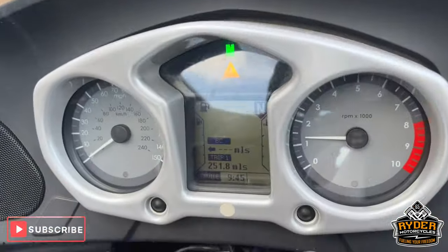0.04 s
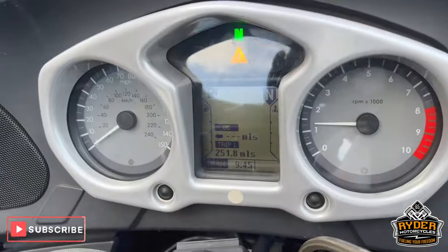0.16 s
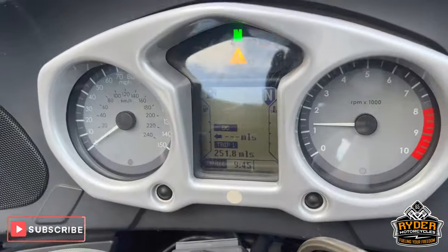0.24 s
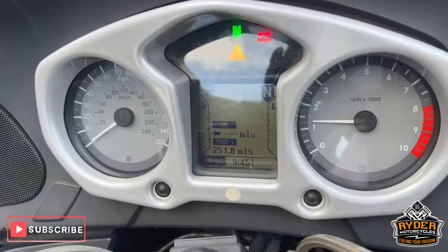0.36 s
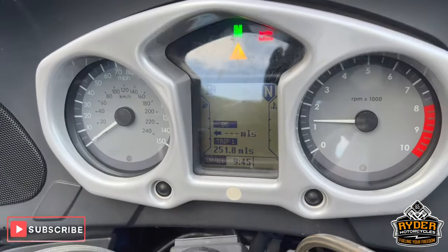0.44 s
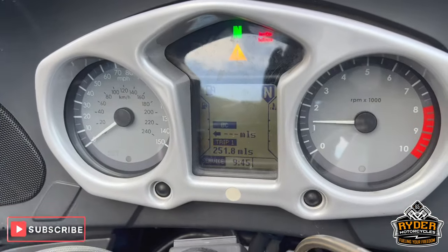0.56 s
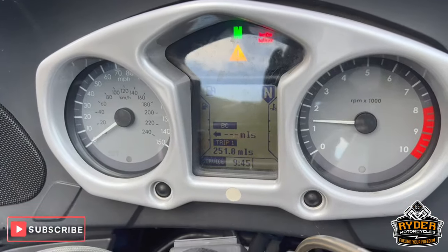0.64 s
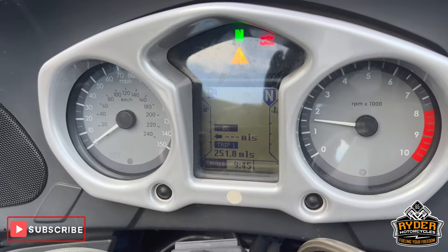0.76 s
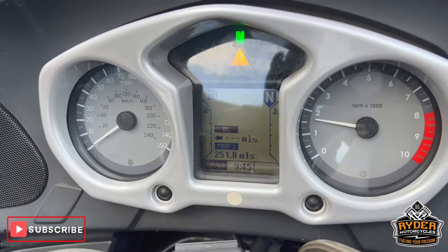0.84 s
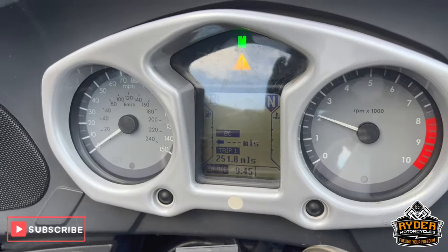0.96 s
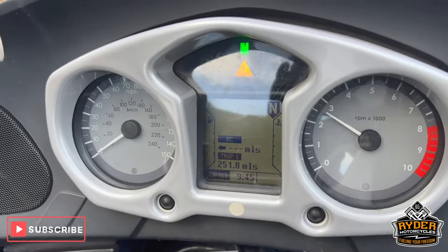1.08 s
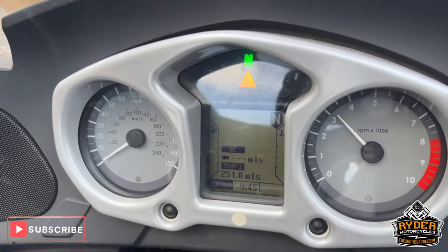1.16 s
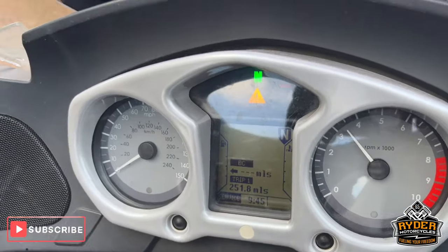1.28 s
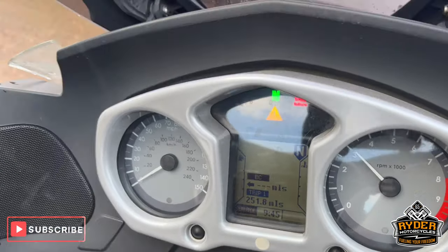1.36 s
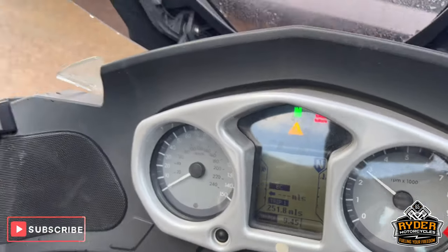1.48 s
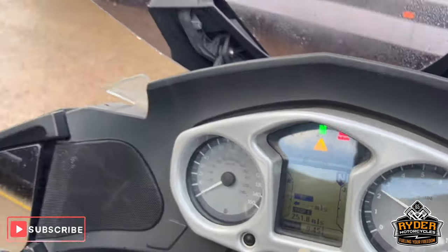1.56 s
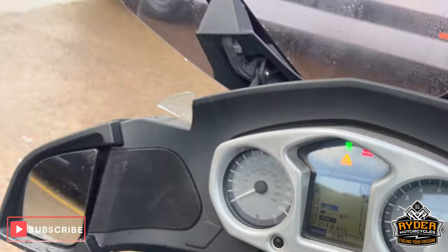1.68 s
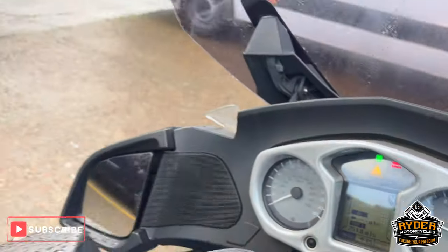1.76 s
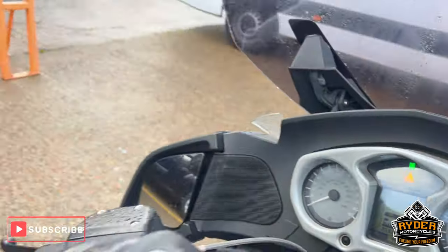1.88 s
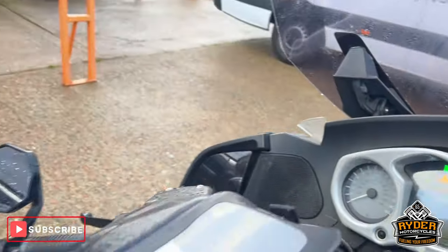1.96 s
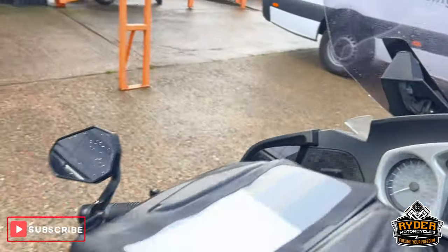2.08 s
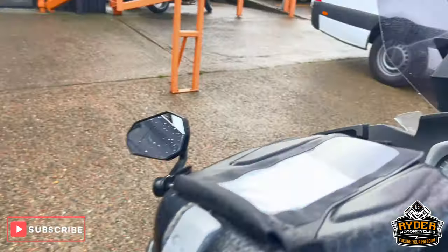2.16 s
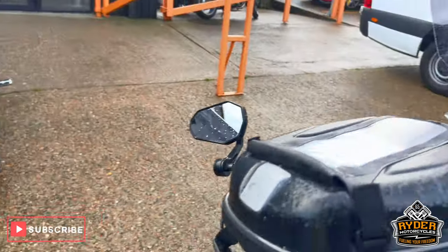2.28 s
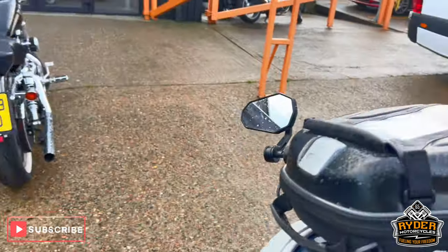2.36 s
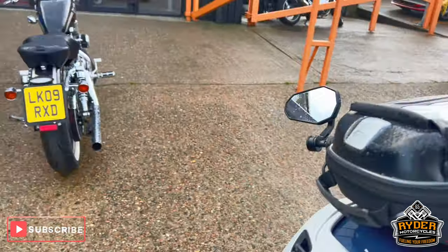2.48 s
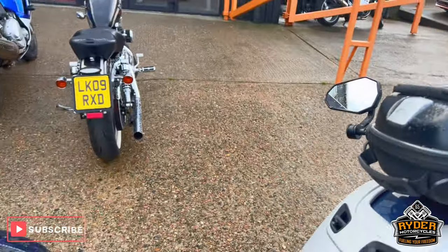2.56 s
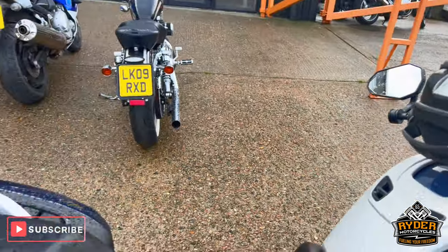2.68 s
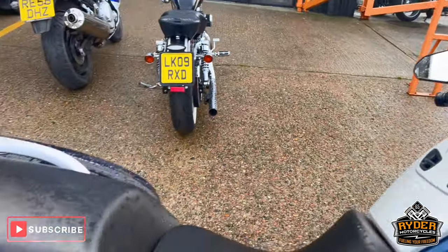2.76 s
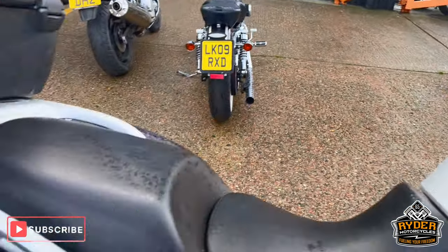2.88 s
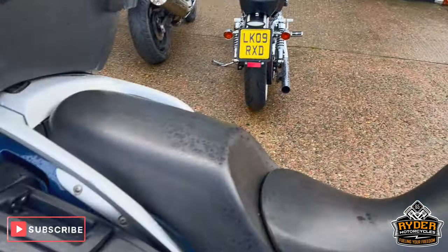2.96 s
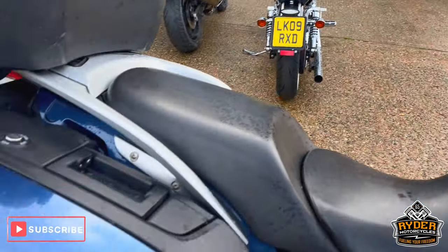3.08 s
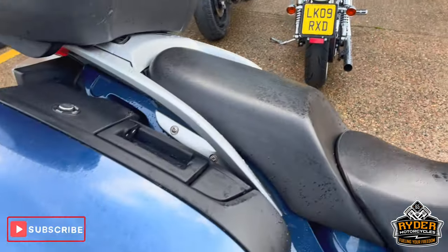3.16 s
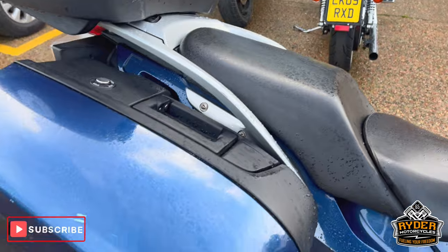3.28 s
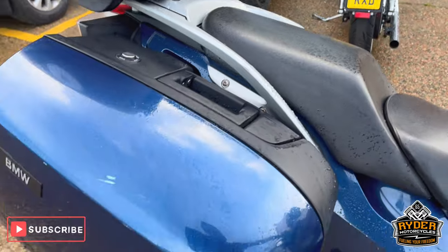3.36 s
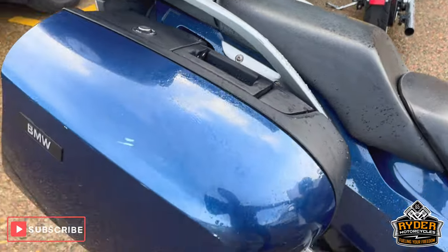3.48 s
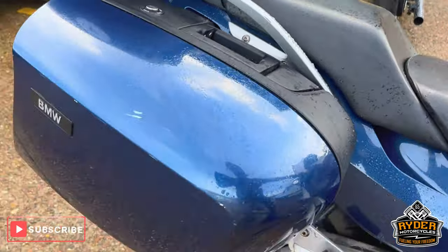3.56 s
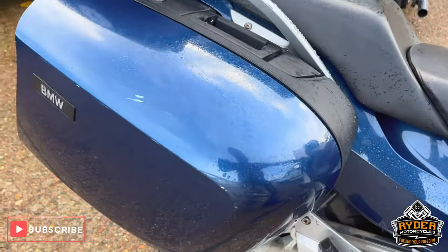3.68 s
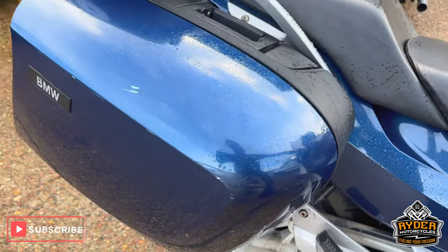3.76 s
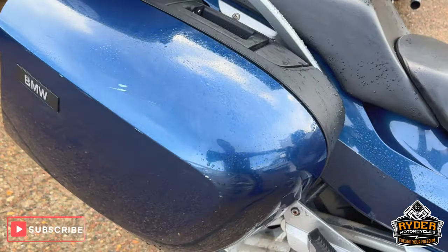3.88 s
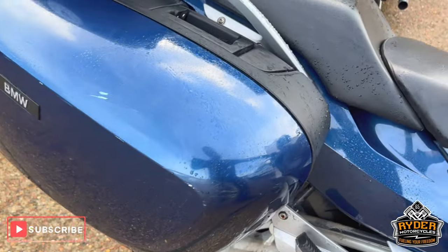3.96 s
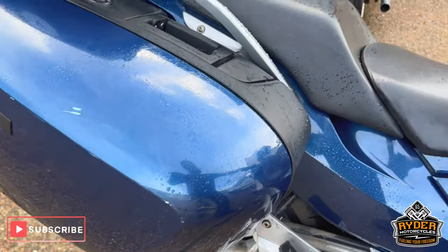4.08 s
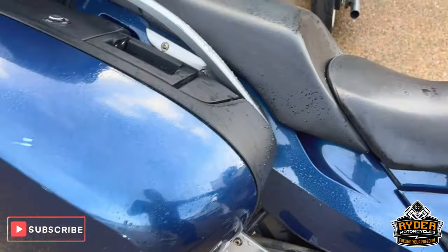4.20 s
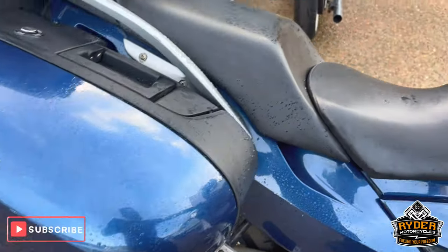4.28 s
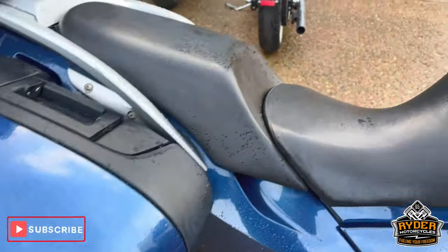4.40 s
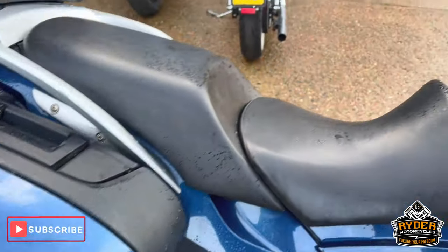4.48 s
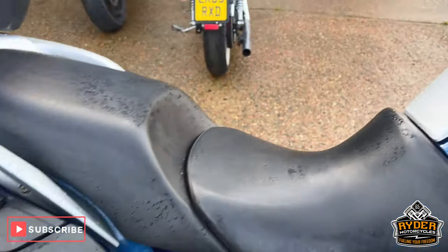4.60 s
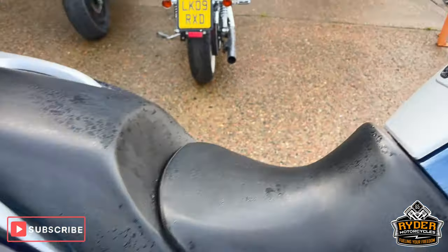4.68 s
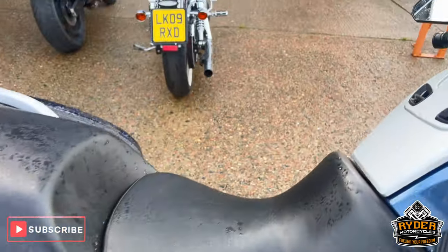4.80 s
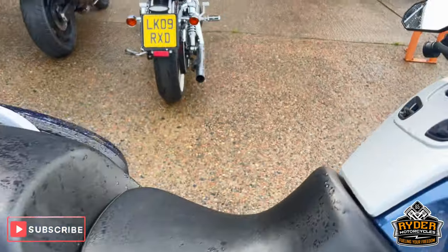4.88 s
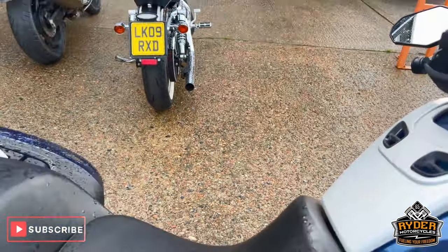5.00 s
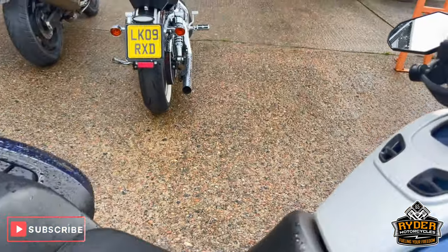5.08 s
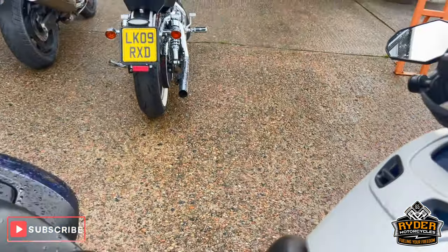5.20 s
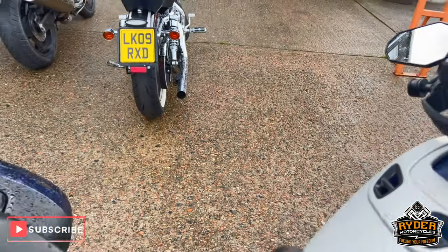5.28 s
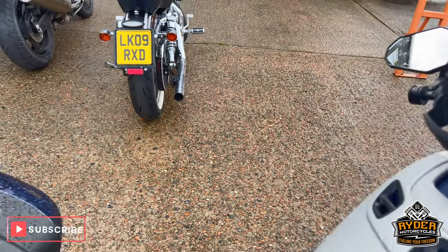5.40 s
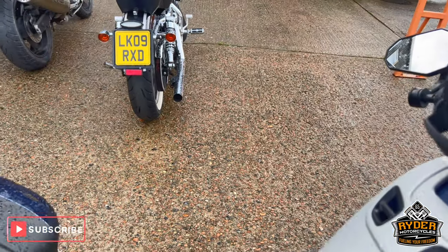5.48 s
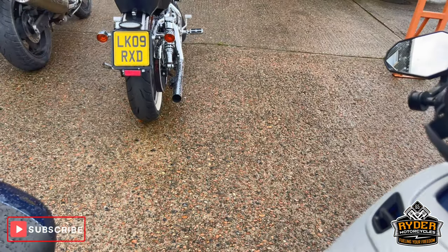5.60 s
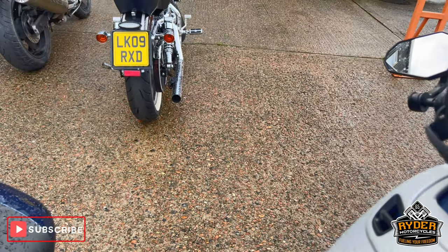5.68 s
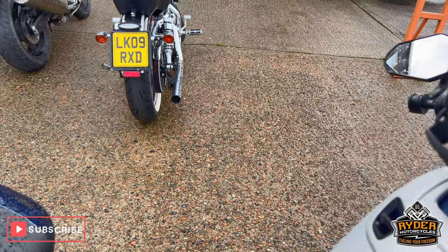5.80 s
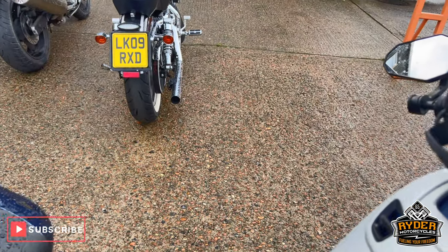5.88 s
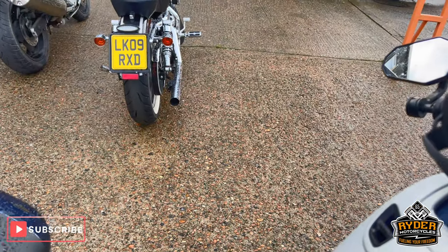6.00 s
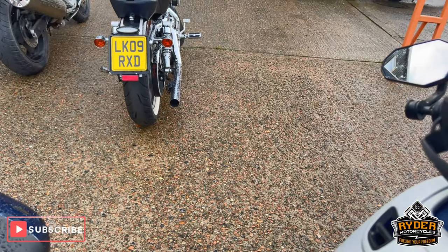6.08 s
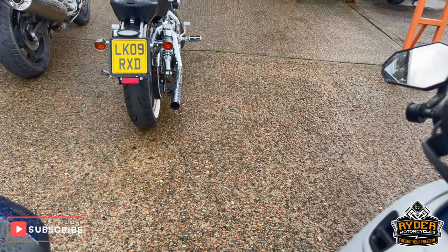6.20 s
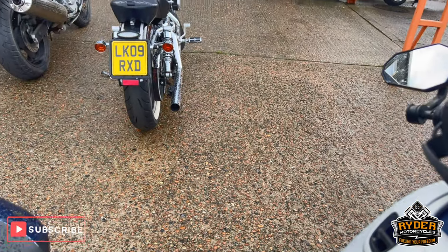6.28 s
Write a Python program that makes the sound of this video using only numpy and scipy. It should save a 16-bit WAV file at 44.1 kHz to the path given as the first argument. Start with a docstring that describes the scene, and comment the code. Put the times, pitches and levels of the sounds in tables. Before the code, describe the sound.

From 0 to 0.5 s a twin-cylinder motorcycle idles close to a handheld phone outdoors: low booming beats, about twenty-two a second, with valve clatter, chain rush and narrow metallic buzzes. At 0.5 s the throttle opens; a honking intake and growing roar, rasp and hiss climb to a peak near 1.17 s, with hoarse gear whine. It shuts, falters and burbles down to idle by about 2.1 s. Between 1.5 and 2.7 s the phone moves toward the silencer, with faint grainy rustles; brief squeaky chirps of rubbing parts cluster around 2.8 to 3.3 s. At 3.1 s a faster, louder blip begins, reaching its higher peak at 3.8 s, the phone squashing the loudest part. Revs tumble with uneven surges and descending whines through 4.7 s. From 5 s to the end at 6.3 s the engine idles steadily, thudding and ticking.

```python
"""A twin-cylinder motorcycle idles at the cockpit: low booming beats, valve clatter, narrow buzzes.
Throttle opens at 0.5 s: the intake honks, firings ring roar and rasp, gas hisses, gears whine; revs fall from 1.2 s.
From 1.4 to 2.8 s the phone moves to the silencer: thin rustles, then chirps of parts rubbing.
A second, faster blip opens at 3.1 s and peaks at 3.8 s; the engine surges down and idles from 5 s to the end.
Tones, pulses and cyclic noise follow one crank angle; filtered noise adds hiss, rumble and rustle."""
import sys
import numpy as np
from scipy import signal
from scipy.fft import rfft, irfft
from scipy.io import wavfile
from scipy.ndimage import uniform_filter1d

SR = 44100
rng = np.random.default_rng(int(sys.argv[2]) if len(sys.argv) > 2 else 0)


def file_out(sig):
    """Save sig as 16-bit WAV at sys.argv[1]."""
    # one column per channel
    cols = np.atleast_2d(sig).T
    # limit, then scale
    lim = np.clip(cols, -1, 1)
    pcm = np.round(lim * 32767).astype(np.int16)
    wavfile.write(sys.argv[1], SR, pcm)


N = 279594
TIME = np.arange(N) / SR

# crank speed, one firing per turn: [t/s, f/Hz]
CRANK_SPEED = [(0.0, 22.04), (0.5, 23.42), (0.76, 26.83), (0.93, 35.61), (1.05, 49.17), (1.17, 62.19),
               (1.42, 42.99), (1.57, 35.86), (1.8, 29.81), (1.95, 26.88), (2.14, 22.04), (2.65, 22.81),
               (3.08, 23.32), (3.3, 27.27), (3.57, 45.6), (3.77, 72.35), (3.83, 77.01), (4.02, 59.63),
               (4.27, 41.36), (4.42, 34.86), (4.6, 29.78), (4.97, 22.01), (5.2, 22.63), (6.34, 22.92)]
# throttle twists: [opening t/s, shutting t/s]
THROTTLE_TWISTS = [(0.48, 1.165), (3.082, 3.81)]
# phone moves from cockpit to silencer: [start t/s, end t/s]
PHONE_MOVE_S = 1.41, 2.8
# uneven burning shifts exhaust levels off the throttle:
# [t/s, half length/s, fundamental level/dB, overtones level/dB, roar level/dB]
BURN_SURGES = [(1.313, 0.098, 12.5, 11, 1), (1.431, 0.029, 5, -8.5, -6.5), (1.584, 0.096, 5, -2, 3),
               (1.71, 0.055, -7, 10.5, 2.5), (3.89, 0.013, -9, 6, 3.5), (4.004, 0.051, 4.5, 13.5, 5),
               (4.121, 0.046, 15, 3, -1), (4.29, 0.032, 9, 3.5, 5.5), (4.477, 0.028, -9, 4, 5)]

# effort laws: [level at idle/dB, slope/(dB/octave), knee/octaves, full-throttle lift/dB]
# exhaust boom, rows: harmonics 1 to 3
BOOM_LAWS = [(-66, 27.5, 1.65, 2), (-49, 19, 0.7, 9), (-51.5, 6, 2, 9)]
# pipe, rows: thud, rumble
PIPE_LAWS = [(-59, 10.5, 1.4, 15), (-53.5, 24.5, 0.95, -0.5)]
# gas, rows: roar, rasp, hiss; levels before the off-idle fade
COCKPIT_LAWS = [(-52.5, 22, 2.1, 9), (-77, 38.5, 1.164, 1), (-58, 15.5, 1.5, 1)]
SILENCER_LAWS = [(-57.5, 24.4, 1.524, 10.5), (-66, 28.9, 1.488, 4.5), (-59, 19.22, 1.53, -1)]
# further boom harmonics of fixed mean level: [multiple of firing rate, level/dB]
UPPER_HARMONICS = [(4, -66), (5, -58), (6, -56)]

# resonances: [f/Hz, width/Hz, relative level/dB]
PIPE_MODES = [(144, 98, -6), (200, 18, -4), (247.3, 5.2, 5.5), (370, 54, -6), (419.1, 7.9, 7),
              (586, 18, -27)]
COCKPIT_ROAR_MODES = [(238, 70, -11.5), (315.6, 36, -0.5), (357.6, 31.4, 0), (414.5, 36, -4),
                      (688, 190, -9), (820, 360, -13.5)]
SILENCER_ROAR_MODES = [(224, 35, -9.5), (298.3, 28, -3), (433, 67, 2), (501.3, 45, -2), (631, 32, -10.5),
                       (731, 71, 1), (906, 670, -8.5)]
COCKPIT_RASP_MODES = [(1026, 170, 9), (1329, 23, 12), (1453, 75, 6.5), (1960, 120, -2.5), (2516, 25, 9.5),
                      (3020, 4500, -5.5)]
SILENCER_RASP_MODES = [(986, 330, -0.5), (1265, 34, 6.5), (1363, 72, -1), (1696, 77, -1), (1910, 97, -3.5),
                       (2380, 1200, -12), (2910, 550, -13.5)]

# noise spectra: [f/Hz, relative density level/dB]
COCKPIT_HISS_SPECTRUM = [(2200, -19), (3200, -6), (4200, 4.5), (5000, 7), (5900, -10), (7000, -1),
                         (8100, -10), (9200, 0), (10600, -19), (12500, -23), (14800, -17), (16000, -35)]
SILENCER_HISS_SPECTRUM = [(1700, -28.5), (2500, 0.5), (3300, -8), (4000, -0.5), (5200, 2), (6900, 1.5),
                          (8000, -4.5), (9100, -2), (10300, -15.5), (12500, -22.5), (15000, -26),
                          (16000, -35)]
CLATTER_SPECTRUM = [(120, -12), (280, 2.5), (500, 0), (800, -3), (1100, -7.5), (1600, -8), (2400, -15),
                    (3300, -15.5), (4500, -7.5), (6000, -18.5), (7000, -15.5), (8200, -22.5), (9100, -14.5),
                    (10500, -30.5), (15000, -49)]
RUSTLE_SPECTRUM = [(4000, -18), (5500, -2), (7500, 0), (9500, -9.5), (12200, -13), (15500, -33)]
SIZZLE_SPECTRUM = [(9000, -41), (10400, -4), (11300, -5), (12300, -12), (13000, -45)]
RUMBLE_SPECTRUM = [(10, -14), (25, -4), (45, -3), (80, 1), (120, -2), (170, -8), (260, -17), (600, -45),
                   (1500, -80)]

# buzzes, and an intake honk (373 Hz row): [start t/s, end t/s, f/Hz, width/Hz, level at idle/dB]
BUZZ_AND_HONK_MODES = [(-.1, 0.476, 1108, 34.6, -60.5), (-.1, 0.58, 850, 30.4, -63),
                       (0.428, 0.915, 1520, 130, -60), (0.45, 0.85, 373, 53, -50.5),
                       (1.453, 1.85, 4750, 295, -64.5), (1.845, 2.086, 4800, 200, -57),
                       (2.188, 2.566, 1914, 50, -67.5), (3.026, 4.71, 5560, 170, -64),
                       (2.93, 4.817, 4850, 119, -65), (3.123, 3.502, 1854, 110, -57),
                       (3.147, 4.591, 1270, 35.5, -64), (3.13, 4.72, 684, 36, -53)]
# rustling swishes: [start t/s, end t/s, body level/dB, sizzle level/dB]
RUSTLE_SWISHES = [(1.57, 1.804, -61, -68), (1.78, 2.114, -57.5, -60.5), (1.9, 1.978, -54, -59),
                  (2.287, 2.73, -66.5, -72.5), (2.394, 2.6, -79, -70)]
# gear whine through casing resonances:
# [t/s, half length/s, multiple of firing rate, level/dB, hoarseness/0-1]
GEAR_WHINES = [(.76, 0.054, 25, -47, 0.24), (0.845, 0.1, 64, -54.5, 0.5), (0.995, 0.063, 25, -34.5, 1),
               (1.15, 0.067, 25, -33, 0.9), (1.284, 0.026, 25, -32.5, 0.4), (1.406, 0.042, 25, -32, 0.07),
               (1.57, 0.036, 25, -42.5, .3), (1.75, 0.042, 25, -42, 0.06), (1.615, 0.064, 128, -57, .5),
               (1.846, 0.18, 64, -55.5, 0.42), (4.16, 0.062, 102, -42, 0.8), (4.22, 0.045, 112, -44, 1),
               (4.398, 0.081, 140, -63, .9), (4.235, .06, 160, -53, 0.6), (4.314, .045, 25, -36.5, 0.17),
               (4.316, 0.025, 102, -47.5, 0.7), (4.377, 0.095, 64, -53.5, 0.4), (4.559, 0.029, 64, -50, .2),
               (4.57, 0.053, 160, -61, 0.5), (4.661, 0.024, 25, -50, 0)]
# rubbing parts: [t/s, half length/s, f/Hz, glide/(Hz/s), level/dB]
RUB_CHIRPS = [(2.2, 0.019, 930, 0.5, -59.5), (2.766, 0.055, 5600, -900, -63),
              (2.853, 0.074, 5020, -1500, -58.5), (2.845, 0.016, 1250, 0, -53),
              (2.893, 0.014, 1880, -4, -58), (2.985, 0.0075, 1830, -2, -51.5), (3.004, 0.0086, 701, 1, -48),
              (3.013, 0.046, 1236, 0.5, -55.5), (3.181, 0.03, 1235, 299.5, -53),
              (3.293, 0.056, 1020, -1500, -49.5)]

IDLE_HZ = 22.5
START_TURNS, STROKE_LAG_TURNS = 0.48, 0.14
THROTTLE_OPEN_S, THROTTLE_SHUT_S = 0.44, 0.03
FALTER_LAG_S, FALTER_HALF_S = 0.0084, 0.02  # combustion falters after the throttle shuts
FALTER_OVERTONES_DB, FALTER_ROAR_DB = -9, -6
TAILPIPE_HZ, TAILPIPE_WIDTH_HZ, TAILPIPE_LIFT_DB = 84.1, 22.6, 7
STEADY_FLUTTER_DB, BURBLE_DB = 0.6, 1.5
OFF_IDLE_OCTAVES = 0.56  # gas noise sets in over this rise
BUZZ_DB_PER_OCTAVE, BUZZ_FLUTTER_DB = 12.5, 1
WOBBLE_TURNS = 0.0042  # crank twists to and fro, blurring the higher whines most
CHIRP_WAVER_SHARE = 0.028  # of the pitch
RUSTLE_FADE_S = 0.048
GAIN_TOP_DB, GAIN_WINDOW_S = -4.5, 0.049
TOP_HZ = 15200


def undb(db):
    """Decibels to gain."""
    return 10 ** (np.asarray(db) / 20)


def unit(x):
    """Scale to rms 1."""
    return x / np.sqrt(np.mean(x ** 2))


def noise():
    """White noise."""
    return rng.standard_normal(N)


def walk(rate_hz):
    """Smooth random wander of rms 1."""
    hold = int(SR / rate_hz)
    steps = noise()[np.arange(N) // hold]
    return unit(uniform_filter1d(uniform_filter1d(steps, hold), hold))


def swell(at_s, half_s):
    """Gaussian bump of height 1."""
    return np.exp(-0.5 * ((TIME - at_s) / half_s) ** 2)


def span(start_s, end_s, fade_s):
    """Window between two times, with linear fades inside."""
    return np.clip(np.minimum(TIME - start_s, end_s - TIME) / fade_s, 0, 1)


def colour(x, spectrum):
    """Filter by a (Hz, dB) spectrum, keeping the power of a white input."""
    hz, db = np.transpose(spectrum)
    f = np.maximum(np.fft.rfftfreq(N, 1 / SR), 1)
    gain = unit(undb(np.interp(np.log(f), np.log(hz), db)))
    return irfft(rfft(x) * gain, N)


def ring(x, modes, low_hz, high_hz):
    """Ring damped modes between band edges, keeping the power of a white input."""
    t = np.arange(SR // 8) / SR
    response = 0
    for k, (hz, width, db) in enumerate(modes):
        decay = np.exp(-np.pi * width * t)
        response = response + (-1) ** k * undb(db) * width * decay * np.cos(2 * np.pi * hz * t)
    band = signal.butter(3, [low_hz, high_hz], "band", fs=SR, output="sos")
    response = signal.sosfilt(band, response)
    return signal.fftconvolve(x, response / np.linalg.norm(response))[:N]


def resonance(hz, centre_hz, width_hz):
    """Power response of one resonance, 1 at its centre."""
    return 1 / (1 + (2 * (hz - centre_hz) / width_hz) ** 2)


def revs(hz):
    """Octaves of crank speed above idle."""
    return np.maximum(np.log2(hz / IDLE_HZ), 0)


def throttle():
    """Opening, 0 shut to 1 open: rolled on, snapped shut."""
    opening = 0
    for opens, shuts in THROTTLE_TWISTS:
        rise = np.clip((TIME - opens) / THROTTLE_OPEN_S, 0, 1)
        opening = opening + rise * np.clip(1 - (TIME - shuts) / THROTTLE_SHUT_S, 0, 1)
    return opening


def effort_db(hz, laws):
    """Layer levels: rise with speed up to a knee, and shift with throttle."""
    octaves, load = revs(hz), throttle()
    return [idle_db + slope_db * np.minimum(octaves, knee) + load_db * load
            for idle_db, slope_db, knee, load_db in laws]


def overrun_db():
    """Off-throttle level shifts of fundamental, overtones and roar: falter, then surges."""
    falter = sum(swell(shuts + FALTER_LAG_S, FALTER_HALF_S) for _, shuts in THROTTLE_TWISTS)
    shifts = sum(np.outer(dbs, swell(at, half)) for at, half, *dbs in BURN_SURGES)
    fundamental, overtones, roar = shifts
    return fundamental, overtones + FALTER_OVERTONES_DB * falter, roar + FALTER_ROAR_DB * falter


def firings(turns, hz, scatter_db, uneven_db, jitter_s):
    """One pulse per turn, mean power about 1, with random size and timing and alternating strength."""
    at = np.flatnonzero(np.diff(np.floor(turns)) > 0)
    chance = rng.standard_normal((len(at), 2))
    size = undb(scatter_db * chance[:, 0] + uneven_db * (-1) ** np.arange(len(at)))
    late = (jitter_s * SR * chance[:, 1]).astype(int)
    pulses = np.zeros(N)
    pulses[np.clip(at + late, 0, N - 1)] = -unit(size) * np.sqrt(SR / hz[at])
    return pulses


def puffs(cycles, length, between):
    """Turbulence bursting once a cycle, decaying over a share of it above a steady floor."""
    return unit(noise() * (between + np.exp(-(cycles % 1) / length)))


def churn(turns, hz, memory, count):
    """Noise on the crank angle, partly repeating every `count` turns: its harmonics glide with the revs."""
    size = 512  # points per turn
    cycles = rng.standard_normal((int(turns[-1] / count) + 2, count * size))
    cycles = signal.lfilter([np.sqrt(1 - memory ** 2)], [1, -memory], cycles, axis=0)
    by_angle = np.interp(turns * size, np.arange(cycles.size), cycles.ravel())
    return by_angle * np.sqrt(size * hz / SR)  # as strong per Hz as white noise at any speed


def rustle():
    """Faint grainy swishes of treble noise while the phone swings round."""
    body, sizzle = colour(noise(), RUSTLE_SPECTRUM), colour(noise(), SIZZLE_SPECTRUM)
    swishes = 0
    for start, end, body_db, sizzle_db in RUSTLE_SWISHES:
        swish = undb(body_db) * body + undb(sizzle_db) * sizzle
        swishes = swishes + span(start, end, RUSTLE_FADE_S) * swish
    return swishes * undb(1.6 * walk(160))


def chirps():
    """Loose parts rub: short gliding tones of wavering pitch."""
    out = 0
    for at, half, hz, glide, db in RUB_CHIRPS:
        pitch_hz = hz * (1 + CHIRP_WAVER_SHARE * walk(640)) + glide * (TIME - at)
        phase = 2 * np.pi * np.cumsum(pitch_hz) / SR
        out = out + np.sqrt(2) * undb(db) * swell(at, half) * np.sin(phase)
    return out


def buzzes_and_honk(turns, hz):
    """Buzzes and an intake honk: narrow resonances driven by noise bursts once a turn, louder with speed."""
    out = 0
    for start, end, mode_hz, width, db in BUZZ_AND_HONK_MODES:
        level = undb(db + BUZZ_FLUTTER_DB * walk(16)) * span(start, end, 0.067)
        bursts = puffs(turns, length=0.76, between=0.6)
        tone = ring(bursts, [(mode_hz, width, 0)], low_hz=mode_hz * 0.22, high_hz=mode_hz * 2.4)
        out = out + level * tone
    return out * undb(BUZZ_DB_PER_OCTAVE * revs(hz))


def clatter(turns, hz):
    """Valves tick four times a turn in a two-turn force pattern; chains and bearings rush on."""
    beat = 4 * turns + 0.049 * walk(68)
    valve = np.floor(beat).astype(int)
    force = undb(2 * noise()[valve] + 3.5 * np.cos(2 * np.pi * valve / 8))
    ticks = unit(force * puffs(beat, length=0.67, between=0.03))
    chains = churn(turns, hz, memory=0.85, count=2)
    mix = ticks * undb(-62.0) + chains * undb(-60.0) + noise() * undb(-58.5)
    return colour(mix, CLATTER_SPECTRUM)


def gears(turns):
    """Meshes whine at multiples of crank speed; backlash makes them hoarse by random modulation."""
    out = 0
    angle = turns + WOBBLE_TURNS * walk(140)
    for at, half, multiple, db, hoarse in GEAR_WHINES:
        pure = np.sqrt(2 * (1 - hoarse))
        rough = np.sqrt(hoarse) * (walk(170) + 1j * walk(170))
        whine = np.real((pure + rough) * np.exp(2j * np.pi * multiple * angle))
        out = out + undb(db) * swell(at, half) * whine
    return out


def pipe(turns, hz):
    """Nearly even firings ring the exhaust pipe over low turbulent rumble, both rising with speed."""
    thud_db, rumble_db = effort_db(hz, PIPE_LAWS)
    pulses = firings(turns, hz, scatter_db=0.6, uneven_db=0.4, jitter_s=0.00006) + 0.1 * noise()
    thud = ring(pulses, PIPE_MODES, low_hz=87, high_hz=715)
    rumble = colour(noise(), RUMBLE_SPECTRUM)
    return thud * undb(thud_db) + rumble * undb(rumble_db)


def boom(turns, hz):
    """Tailpipe pressure: low firing harmonics align in one dip per turn; a resonance lifts those near it."""
    fundamental_db, overtones_db, _ = overrun_db()
    harmonics = []
    for k, db in enumerate(effort_db(hz, BOOM_LAWS), 1):
        shift_db = fundamental_db if k == 1 else overtones_db
        lift_db = TAILPIPE_LIFT_DB * resonance(k * hz, TAILPIPE_HZ, TAILPIPE_WIDTH_HZ)
        harmonics.append((k, db + shift_db + lift_db))
    # burbles off throttle while above idle speed
    running_down = np.minimum(2 * revs(hz), 1) * (1 - throttle())
    flutter_db = STEADY_FLUTTER_DB + BURBLE_DB * running_down
    out = 0
    for k, db in harmonics + list(UPPER_HARMONICS):
        level = undb(db + flutter_db * walk(23.97))
        out = out - np.sqrt(2) * level * np.cos(2 * np.pi * k * turns)
    return out


def blip(turns, hz, laws, roar_modes, rasp_modes, hiss_spectrum, roar_gas, rasp_gas, uneven_db):
    """Firings and churning gas ring roar and rasp resonances; the flow hisses twice a turn."""
    roar_db, rasp_db, hiss_db = effort_db(hz, laws)
    *_, surge_db = overrun_db()
    stroke = turns - STROKE_LAG_TURNS
    cylinder = undb(uneven_db * (-1) ** np.floor(stroke))  # alternate firings differ
    pulses = firings(stroke, hz, scatter_db=1.4, uneven_db=0, jitter_s=0.00009)
    # gas surges at each firing, then eases off
    gas = churn(turns, hz, memory=0.82, count=2) * unit(0.5 + np.exp(-(stroke % 1) / 0.5))
    roar_drive = cylinder * (pulses + roar_gas * gas) / np.hypot(1, roar_gas)
    rasp_drive = cylinder * (pulses + rasp_gas * gas) / np.hypot(1, rasp_gas)
    roar = ring(roar_drive, roar_modes, low_hz=196, high_hz=960)
    rasp = ring(rasp_drive, rasp_modes, low_hz=803, high_hz=3670)
    grit = unit(undb(1.0 * walk(260)))  # random fine roughness of the hiss
    hiss = colour(grit * puffs(2 * turns, length=0.54, between=4.65), hiss_spectrum)
    return roar * undb(roar_db + surge_db) + rasp * undb(rasp_db) + hiss * undb(hiss_db)


def scene():
    """Sum the layers; the gas sound crossfades from cockpit to silencer and fades in above idle."""
    hz = np.interp(TIME, *np.transpose(CRANK_SPEED))
    turns = START_TURNS + np.cumsum(hz) / SR
    cockpit = blip(turns, hz, COCKPIT_LAWS, COCKPIT_ROAR_MODES, COCKPIT_RASP_MODES,
                   COCKPIT_HISS_SPECTRUM, roar_gas=2.2, rasp_gas=4, uneven_db=1.5)
    silencer = blip(turns, hz, SILENCER_LAWS, SILENCER_ROAR_MODES, SILENCER_RASP_MODES,
                    SILENCER_HISS_SPECTRUM, roar_gas=1.7, rasp_gas=2.8, uneven_db=1)
    rear = np.interp(TIME, PHONE_MOVE_S, [0, 1])
    off_idle = np.minimum(revs(hz) / OFF_IDLE_OCTAVES, 1)
    gas = ((1 - rear) * cockpit + rear * silencer) * off_idle
    background = rustle() + chirps() + buzzes_and_honk(turns, hz)
    engine = clatter(turns, hz) + gears(turns) + pipe(turns, hz) + boom(turns, hz)
    return (background + engine + gas)[None]


def record(dry):
    """The phone's gain control turns down loud stretches; peaks are rounded and the top cut."""
    power = uniform_filter1d(dry ** 2, int(GAIN_WINDOW_S * SR))
    held = dry / (1 + (power / undb(GAIN_TOP_DB) ** 2) ** 4) ** (1 / 8)
    ceiling = 0.8
    fade_in = np.minimum(TIME / 0.004, 1)
    rounded = fade_in * held / (1 + (held / ceiling) ** 6) ** (1 / 6)
    low_pass = signal.ellip(8, 0.2, 70, TOP_HZ, fs=SR, output="sos")
    return signal.sosfilt(low_pass, rounded)


dry = scene()
out = record(dry)
file_out(out)
```